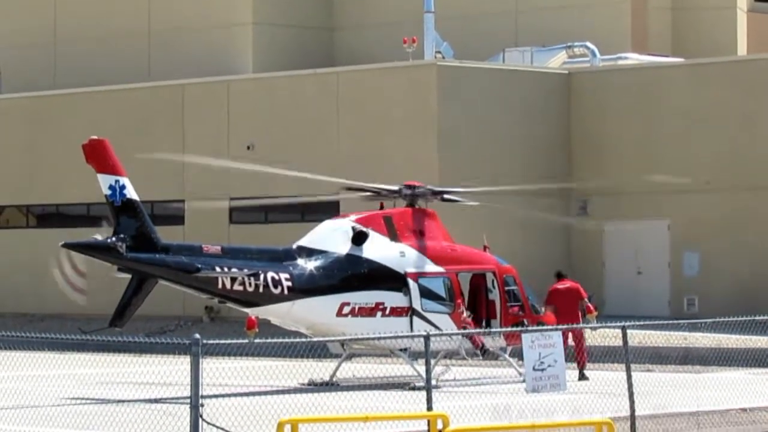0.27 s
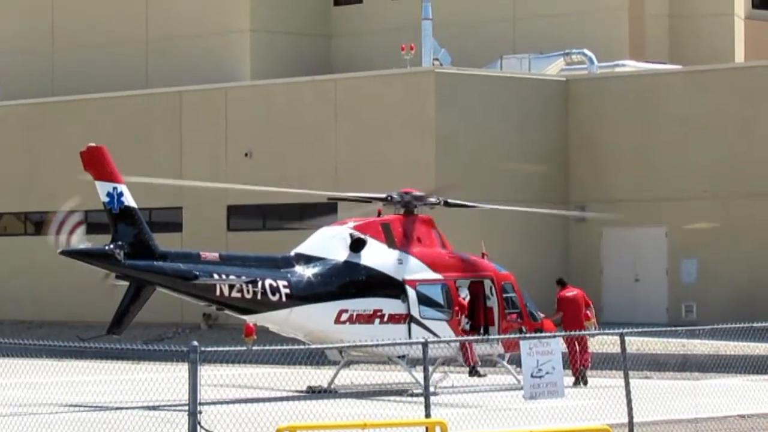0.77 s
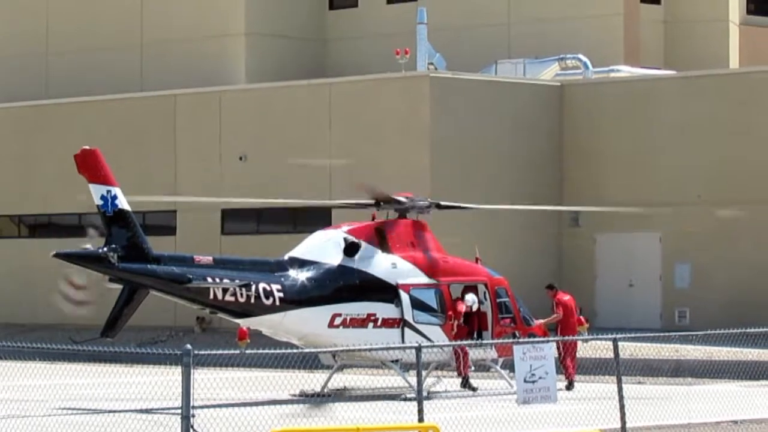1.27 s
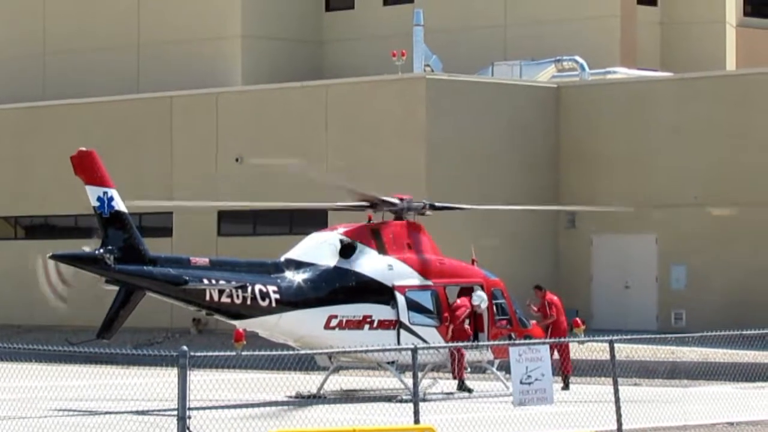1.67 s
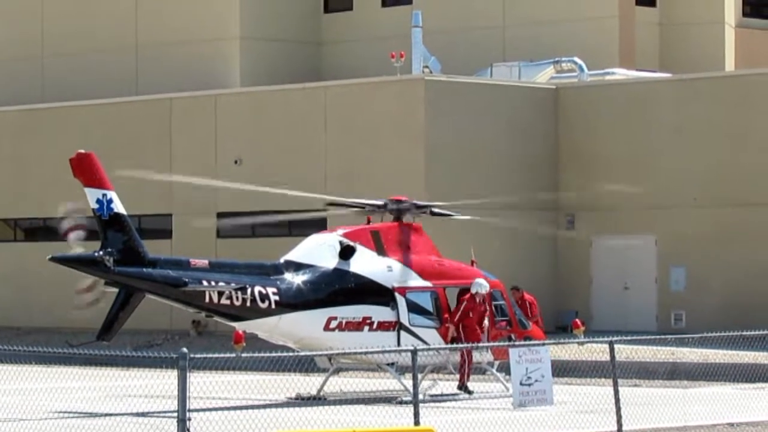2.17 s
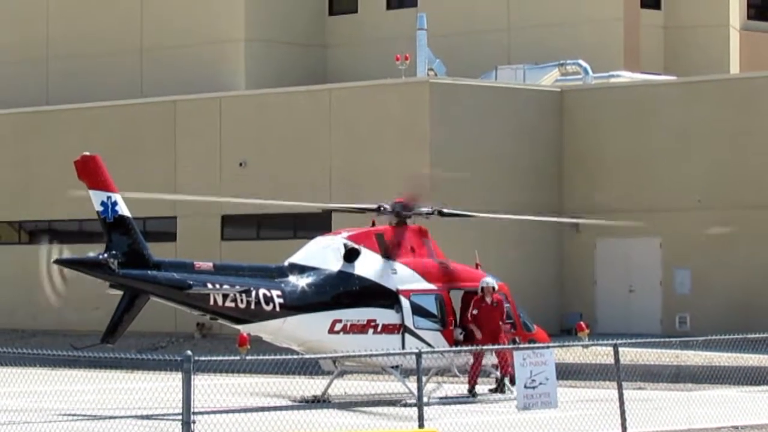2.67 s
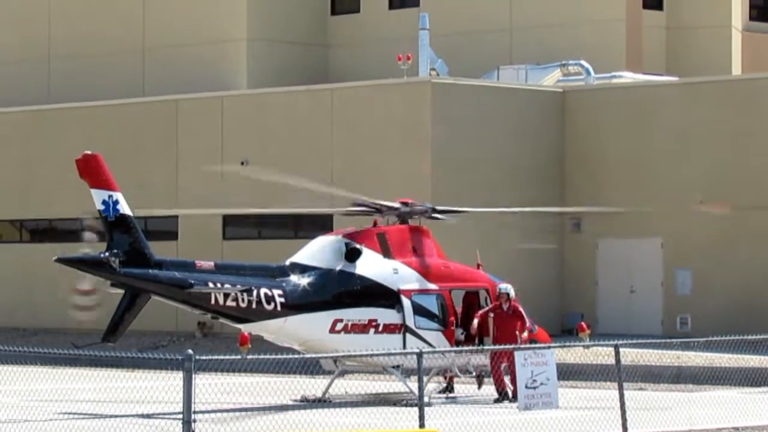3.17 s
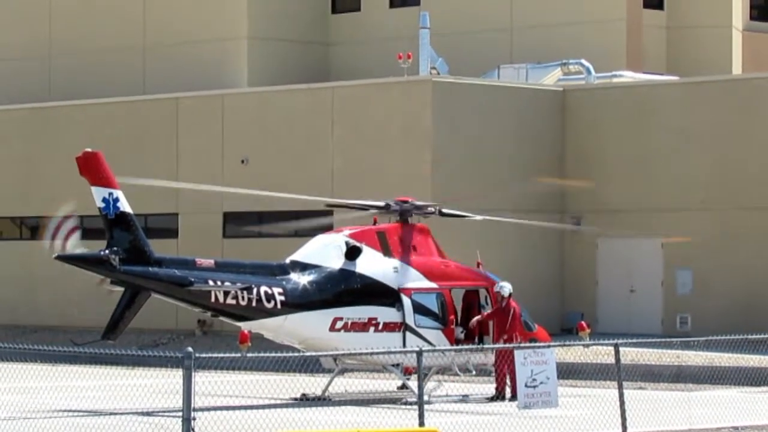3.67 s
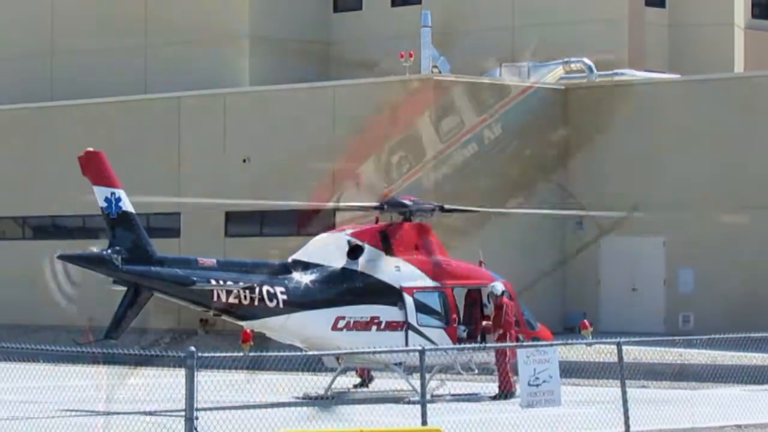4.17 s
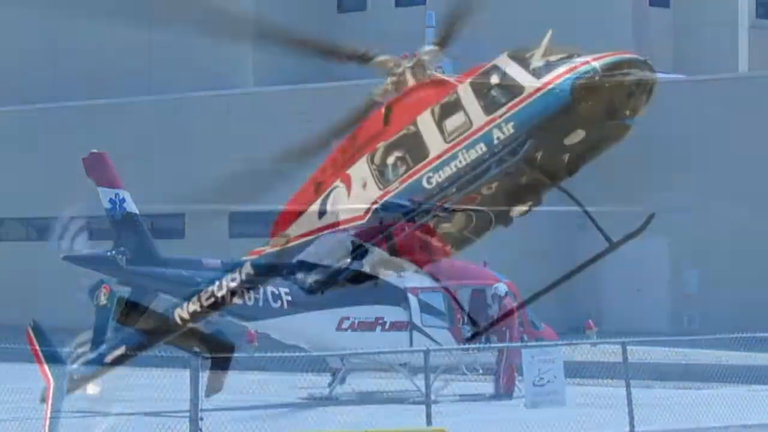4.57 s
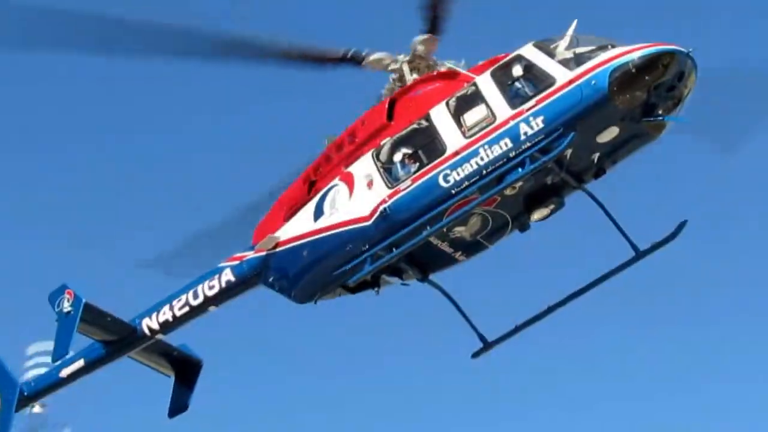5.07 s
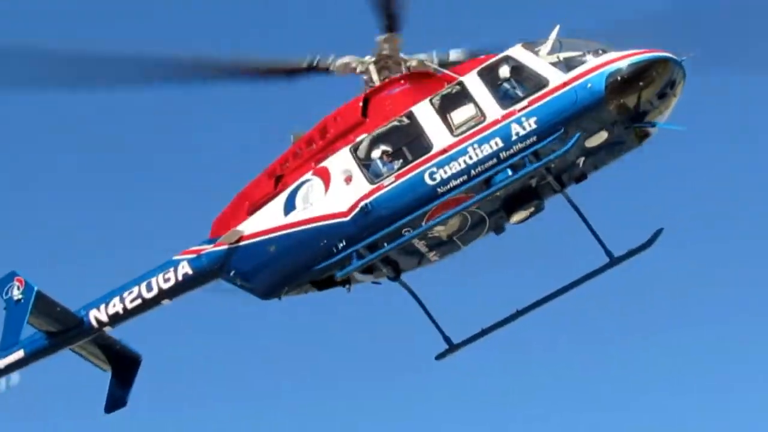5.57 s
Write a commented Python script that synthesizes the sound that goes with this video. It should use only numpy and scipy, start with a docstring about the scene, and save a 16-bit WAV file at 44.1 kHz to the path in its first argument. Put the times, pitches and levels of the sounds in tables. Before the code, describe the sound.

Outdoors on a helicopter pad, a turbine idles at some distance, with airy hiss, gear whine and a thin whistle that swell and fade. Wind gusts buffet the microphone. About four seconds in, the sound cuts instantly to a much louder helicopter close overhead, with fast blade thumps, cracks, swishing downwash and a tail rotor buzz until the end.

```python
"""On a helicopter pad a turbine idles: filtered noise makes its intake hiss and gear whine, and wavering
sine tones its compressor whistle. They swell and fade in the moving air while gusts buffet the microphone.
Abruptly, a second helicopter is close overhead. Timed pulses make each main blade thump and crack, and
noise that opens at each beat makes it swish. The tail rotor buzzes in steady harmonics over the noise
of the downwash, with a very high turbine whistle on top."""
import sys
import numpy as np
from scipy import signal
from scipy.fft import rfft, irfft
from scipy.io import wavfile

SR = 44100
rng = np.random.default_rng(int(sys.argv[2]) if len(sys.argv) > 2 else 0)


def inscribe(sig):
    """Save sig as 16-bit PCM at rate SR to the path in sys.argv[1].

    A 1-D sig is mono; a 2-D sig holds one channel per row.
    Samples are clipped to [-1, 1] before scaling.
    """
    pcm = np.round(np.clip(np.atleast_2d(sig).T, -1, 1) * 32767)
    wavfile.write(sys.argv[1], SR, pcm.astype(np.int16))


N = 256662
TIME = np.arange(N) / SR  # seconds
FREQ = np.fft.rfftfreq(N, 1 / SR)  # Hz
SIDES = np.array([[1], [-1]])  # left, right

CUT_S = 4.1042  # the pad gives way to the flight
FIRST_BLADE_S = 4.1051
TAIL_HZ = 84.6  # tail blades passing per second

# Stereo width on the pad and overhead. Each row: frequency in Hz, side minus mid in dB.
PAD_SIDE = [(1200, -14), (2400, -8), (4400, -6), (8000, -4)]
AIR_SIDE = [(60, 11), (150, -8), (700, -11.5), (2400, -6), (4400, -1), (8000, -6.5), (15000, -5)]
# Stereo balance on the pad and overhead. Each row: frequency in Hz, left minus right in dB.
PAD_BALANCE = [(700, -0.5), (2400, -5), (4400, 3), (8000, 3.5), (15000, -11)]
AIR_BALANCE = [(110, -1.5), (700, 0.5), (2400, -3), (4400, 4), (8000, 4.5), (12000, -1.5)]


def undb(db):
    """Turn decibels into a gain."""
    return 10 ** (np.asarray(db) / 20)


def unit(x):
    """Scale to an rms (average strength) of 1."""
    return x / np.sqrt(np.mean(x ** 2))


def curves(table):
    """Join each column of a table by straight lines in time."""
    seconds, *columns = np.transpose(table)
    return [np.interp(TIME, seconds, column) for column in columns]


def across(points):
    """Join (Hz, value) points by straight lines on a log-frequency axis."""
    hz, value = np.transpose(points)
    return np.interp(np.log(FREQ + 1), np.log(hz), value)


def drift(rate_hz):
    """Smooth random wandering with spread 1; a higher rate wanders faster."""
    bins = FREQ[FREQ < 4 * rate_hz]
    real, imaginary = rng.standard_normal((8192, 2))[:len(bins)].T
    spectrum = (real + 1j * imaginary) * np.exp(-(bins / rate_hz) ** 2)
    slow = unit(irfft(spectrum, 16384))
    return np.interp(TIME, np.linspace(0, TIME[-1], len(slow)), slow)


def noise(gain, side, balance):
    """Stereo turbulence of rms 1 with a given colour, width and balance."""
    mid, wide = rfft(rng.standard_normal((2, N)))
    both = mid + SIDES * wide * undb(across(side))
    both = both * undb(SIDES * across(balance) / 2)
    return unit(irfft(gain * both, N))


def ring(pulses, spectrum):
    """Give pulses this spectrum, with no sound ahead of each pulse."""
    # folding the cepstrum forward in time gives the minimum-phase response
    cepstrum = irfft(np.log(undb(across(spectrum))), N)
    cepstrum[1:N // 2] *= 2
    cepstrum[N // 2 + 1:] = 0
    return irfft(rfft(pulses) * np.exp(rfft(cepstrum)), N)


def impulses(times, sizes):
    """Place one impulse at each time in seconds."""
    return np.bincount(np.maximum(times * SR, 0).astype(int), sizes, N)[:N]


def swell(age, rise_s, fall_s):
    """An envelope that rises to 1 at age 0, then dies away."""
    return np.exp(np.minimum(age, 0) / rise_s - np.maximum(age, 0) / fall_s)


def cycle(hz):
    """Phase in radians of a moving frequency."""
    return 2 * np.pi * np.cumsum(hz) / SR


def wind():
    """Eddies push one microphone port while they pull the other; the breeze gusts around brighter buffets."""
    # Steady breeze. Each row: time in seconds, level in dB before lulls and flutter.
    breeze_level = [(0.3, -42), (1.3, -44), (2.2, -42), (3.4, -40.5), (4.05, -41.5)]
    # Buffets. Each row: start of the fall in seconds, reference level in dB for the blow and its gust.
    buffets = [(0.105, -37.5), (0.197, -34.5), (0.479, -33), (0.596, -34), (0.637, -30.5), (0.745, -34),
               (0.862, -36.5), (0.985, -32.5), (1.072, -37), (1.241, -36), (1.321, -35), (1.406, -31.5),
               (2.09, -37.5), (2.209, -29.5), (2.314, -34), (2.581, -33), (2.66, -37), (2.99, -37),
               (3.325, -33.5), (3.495, -32), (3.596, -33.5), (3.685, -33), (3.75, -44), (3.917, -38),
               (4.022, -35)]
    # Middle of each lull in the breeze, in seconds.
    lulls_s = [0.035, 2.2, 2.77]
    # Colours of the breeze and of the blows. Each row: frequency in Hz, relative dB per Hz.
    breeze_colour = [(25, -21), (60, -0.5), (130, 0.5), (250, -5), (420, -10), (650, -20.5), (1200, -29),
                     (4000, -60)]
    blow_colour = [(40, -18), (150, 6.5), (400, -1), (750, -9.5), (1500, -22), (3000, -45), (9000, -80)]
    # the side is stronger than the mid: the two ports move against each other
    opposed, balance = [(400, 8.7), (1000, 2.5)], [(60, 0.45), (300, 1.67)]
    lull_db, lull_s = -10, 0.043

    breeze_db, = curves(breeze_level)
    lull = sum(np.exp(-((TIME - s) / lull_s) ** 2) for s in lulls_s)
    # each buffet is a sharp blow inside a softer gust
    gusts = sum(undb(db - 4.5) * swell(TIME - s, rise_s=0.041, fall_s=0.036) for s, db in buffets)
    blows = sum(undb(db + 3) * swell(TIME - s, rise_s=0.004, fall_s=0.0076) for s, db in buffets)
    flow = np.hypot(undb(breeze_db), gusts)
    flow = flow * undb(lull_db * lull + 2.6 * drift(42))
    breeze = flow * noise(undb(across(breeze_colour)), opposed, balance)
    return breeze + blows * noise(undb(across(blow_colour)), opposed, balance)


def turbine():
    """Rushing intake air hisses and gears whine in narrow bands, swelling and fading in the moving air."""
    # How loud the idling turbine arrives on the wind. Each row: time in seconds, reference level in dB.
    carry = [(0.0, -47.5), (0.18, -50), (0.58, -47.5), (0.72, -53.5), (0.8, -49), (1.04, -54), (1.18, -52),
             (1.32, -54), (1.52, -53.5), (2.2, -53.5), (2.44, -52), (2.8, -50), (2.88, -48), (3.24, -49.5),
             (3.48, -49.5), (3.66, -48.5), (3.72, -52.0), (4.06, -52)]
    # Low and high gear tones. Each row: time in seconds, reference level in dB.
    low_gear = [(0.0, -54), (0.2, -63), (0.88, -50.5), (1.1, -64.0), (1.34, -56), (2.08, -70),
                (2.24, -55.5), (2.58, -57), (2.96, -49), (3.1, -55), (3.6, -54.5), (4.06, -65)]
    high_gear = [(0.0, -53), (0.18, -51.5), (0.24, -60), (0.44, -50.5), (1.4, -63.5), (1.62, -56.0),
                 (1.78, -67), (1.84, -55.5), (4.06, -55)]
    # Three groups: low gear, high gear, and upper tones that follow the turbine's level.
    # Each row in a group: frequency in Hz, half-width in Hz, dB relative to the group's level.
    whine = [
        [(2078, 40, 1.5)],
        [(2348, 24, 2.5), (2597, 18, -8.5)],
        [(3323, 77, -6.5), (3490, 39, -21), (3540, 51, -10.5)],
    ]
    # Colour of the intake hiss. Each row: frequency in Hz, relative dB per Hz.
    hiss_colour = [(400, 5), (700, -3), (1100, 4), (1600, -3.5), (2200, 3.5), (3000, 3), (3550, 1),
                   (4150, -5.5), (5200, -3.5), (6800, -2), (7500, -9), (10500, -14.5), (13500, -27),
                   (15500, -55)]

    (carry_db,), (low_db,), (high_db,) = curves(carry), curves(low_gear), curves(high_gear)
    hiss = noise(undb(across(hiss_colour)), PAD_SIDE, PAD_BALANCE)
    out = hiss * undb(carry_db + 3 + 1.0 * drift(33))
    for tones, level_db in zip(whine, (low_db, high_db, carry_db)):
        for hz, width_hz, db in tones:
            tone = noise(1 / (1 + ((FREQ - hz) / width_hz) ** 2), PAD_SIDE, PAD_BALANCE)
            # each tone also fades a little on its own
            out = out + tone * undb(level_db + db + 0.5 * drift(6.8))
    return out


def compressor():
    """The blade tone and its faint octave flutter at each ear, in a skirt of sound scattered by the air."""
    # Whistle strength. Each row: time in seconds, level in dB before trim and fading.
    whistle_level = [(0, -49), (0.2, -56), (0.31, -47), (0.45, -61.5), (0.6, -46.5), (0.72, -59),
                     (1.15, -63), (1.48, -60), (1.59, -52), (1.98, -61.5), (2.35, -60), (2.49, -50),
                     (2.66, -74), (2.78, -56.5), (3.0, -52), (3.14, -65), (3.45, -59.5), (3.62, -53.5),
                     (3.72, -59.5), (4.05, -61.5)]
    # Where the whistle is heard. Each row: time in seconds, left minus right in dB before fading.
    whistle_pan = [(0, 11), (1.2, 10.5), (3.0, 8), (3.3, -3), (3.8, 13)]
    whistle_hz = 6081

    (level_db,), (pan_db,) = curves(whistle_level), curves(whistle_pan)
    phase = cycle(whistle_hz + 4 * drift(47.0))
    phase = phase + 0.21 * np.array([drift(19), drift(22)])  # the ears differ
    flutter = undb(2.4 * np.array([drift(25), drift(25)]))
    fade_db = 1.5 * np.array([drift(6.5), drift(13)])
    tone = unit(np.sin(phase) * flutter)
    tone = tone * undb(1.5 + fade_db + SIDES * pan_db / 2)
    octave = np.sin(2 * phase) * undb(-13 + 2 * drift(7)) * flutter[::-1]  # ears swapped
    skirt = noise(1 / np.hypot(1, (FREQ - whistle_hz) / 35) ** 1.4, PAD_SIDE, PAD_BALANCE)
    return (tone + octave) * undb(level_db) + undb(-60.0) * skirt


def downwash(roar_db):
    """Air driven down by the rotor roars as noise, chopped by the tail blades."""
    # Colour of the roar before its lows are thinned. Each row: frequency in Hz, relative dB per Hz.
    wash_colour = [(25, -21), (190, 4), (400, -4), (600, -0.5), (740, -4.5), (980, 0.5), (1200, -7.5),
                   (2200, -9.5), (3600, -18), (4800, -24.5), (8300, -21), (10200, -26.5), (12000, -20.5),
                   (13800, -29), (15500, -27)]
    chop = 1 + 0.15 * np.cos(2 * np.pi * TAIL_HZ * TIME)
    above_thump = 1 / np.hypot(1, (110 / (FREQ + 1)) ** 2)  # leaves the lows to the thump
    wash = noise(undb(across(wash_colour)) * above_thump, AIR_SIDE, AIR_BALANCE)
    return wash * chop * undb(roar_db - 1.0 + 1.12 * drift(190))


def high_whistle(whistle_db):
    """The flying turbine whistles very high, as a flickering narrow band of noise."""
    band = noise(1 / (1 + ((FREQ - 14650) / 200) ** 2), AIR_SIDE, AIR_BALANCE)
    return band * undb(whistle_db - 1.5 + 2.5 * drift(40))


def tail_rotor():
    """A buzz of blade harmonics that waver in the downwash, with two gearbox tones above it."""
    # Buzz harmonics. Each row: multiple of the tail blade rate, average level in dB.
    harmonics = [(2, -38), (3, -43.5), (4, -34.5), (5, -42)]
    phase = cycle(TAIL_HZ + .15 * drift(4.5))
    buzz = sum(undb(db + 0.25 * drift(25.0)) * np.cos(round(k) * phase) for k, db in harmonics)
    gear_tones = [(532, -43.5), (619, -40)]  # Hz, dB
    gears = sum(undb(db) * np.cos(cycle(hz + 3 * drift(11.9))) for hz, db in gear_tones)
    return np.sqrt(2) * (buzz + gears)  # makes the dB values rms levels


def first_beat():
    """A short burst of noise makes the first blade beat louder and brighter."""
    # frequency in Hz, relative dB per Hz
    colour = [(100, 7.5), (500, 4), (2800, -1.5), (5000, -15), (8000, -10.5), (15000, -20)]
    burst = noise(undb(across(colour)), AIR_SIDE, AIR_BALANCE)
    return burst * undb(-13.0) * swell(TIME - FIRST_BLADE_S, rise_s=0.00063, fall_s=0.0072)


def main_rotor(roar_db, thump_db):
    """Each blade sends a suction pulse, cracks through the wake of the one before and trails a swish."""
    # Colours of the thump and the swish. Each row: frequency in Hz, relative dB per Hz.
    thump_colour = [(8, -61), (28, -9), (56, -4), (84, 1.5), (112, 11), (140, 7.5), (170, 0.5), (220, -5),
                    (280, -3.5), (335, 2), (400, -17), (570, -5), (740, -13.5), (900, -14.5), (1300, -33),
                    (3000, -51)]
    swish_colour = [(40, -40), (150, -19.5), (550, 9.5), (1000, -1), (1250, -2), (2300, -2), (3700, -14.5),
                    (5000, -16.5), (7500, -14.5), (10000, -21.5), (15000, -36)]
    crack_colour = [(25, -47), (100, -25), (700, -0.5), (2200, -7), (4500, -23.5), (7500, -20.5),
                    (14000, -38)]  # Hz, relative dB
    blade_hz = 27.945  # main blades passing per second

    passes = FIRST_BLADE_S + np.arange(int((N / SR - CUT_S) * blade_hz) + 1) / blade_hz
    chance = rng.standard_normal((len(passes), 7)).T  # makes every beat a little different
    share = np.sqrt(1 - CUT_S * SR / N)  # the rotor sounds for only this part of the time

    pulses = impulses(passes + .0001 * chance[0], undb(.7 * chance[1]))
    thump = -ring(pulses, thump_colour)  # minus: suction
    # two sharp wake crossings a few milliseconds apart
    first, second = 1 + .45 * np.tanh(chance[[3, 5]])
    strikes = impulses(passes + .0007 + .0003 * chance[2], first)
    strikes = strikes + impulses(passes + .0038 + .0007 * chance[4], undb(-1.5) * second)
    crack = -ring(strikes, crack_colour)
    # the swish peaks 3.5 ms after each pass; age counts blade periods from that peak
    age = ((TIME - FIRST_BLADE_S - .0035) * blade_hz + .5) % 1 - .5
    force_db = np.interp(TIME, passes, 1.3 * chance[6])
    gate = unit(swell(age / blade_hz, rise_s=.003, fall_s=.0065)) * undb(force_db)
    swish = gate * noise(undb(across(swish_colour)), AIR_SIDE, AIR_BALANCE)

    # the cracks grow by 2 dB per second against the roar as the helicopter comes on
    crack = undb(-10.0 + 2 * (TIME - CUT_S)) * share * unit(crack)
    slap = undb(roar_db) * (undb(-3.5) * swish + crack)
    return slap + share * unit(thump) * undb(thump_db - 1.2 + SIDES * .5)


def overhead():
    """Both rotors sound over the downwash roar and a very high turbine whistle."""
    # Reference levels overhead. Each row: time in seconds, roar in dB, thump in dB, whistle in dB.
    flight = [(4.14, -23.5, -27.5, -48), (4.274, -25.5, -27.5, -56), (5.106, -26, -25.5, -47),
              (5.156, -26, -30, -46), (5.8, -24.5, -27.5, -42)]
    roar_db, thump_db, whistle_db = curves(flight)
    air = downwash(roar_db) + high_whistle(whistle_db)
    return air + tail_rotor() + first_beat() + main_rotor(roar_db, thump_db)


def scene():
    """The pad gives way at once, within a millisecond, to the helicopter in flight."""
    flying = np.clip((TIME - CUT_S) / .001, 0, 1)
    pad = wind() + turbine() + compressor()
    return (1 - flying) * pad + flying * overhead()


def record(dry):
    """A steep low-pass filter removes the treble above 15750 Hz."""
    low_pass = signal.ellip(10, .2, 80, 15750, fs=SR, output="sos")
    return signal.sosfilt(low_pass, dry)


dry = scene()
out = record(dry)
inscribe(out)
```